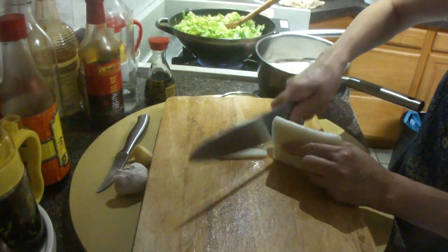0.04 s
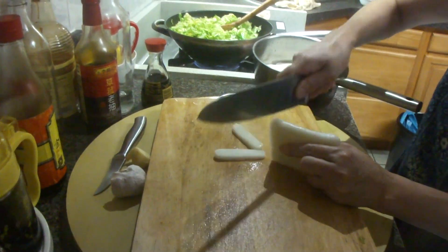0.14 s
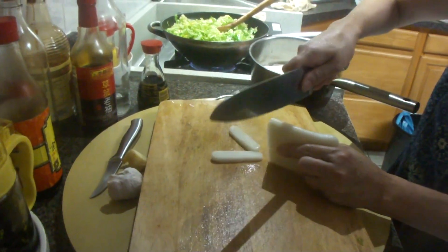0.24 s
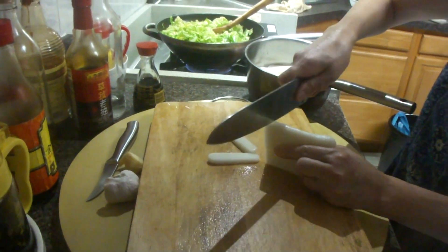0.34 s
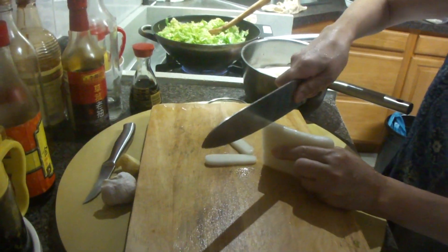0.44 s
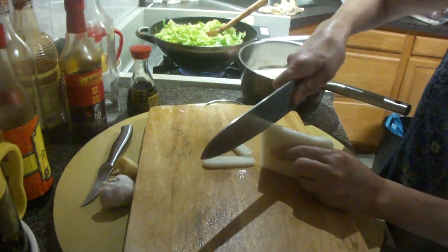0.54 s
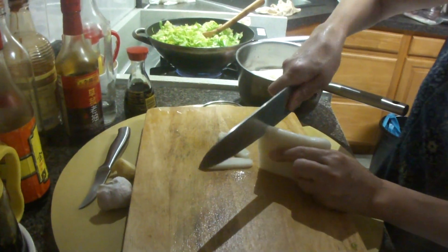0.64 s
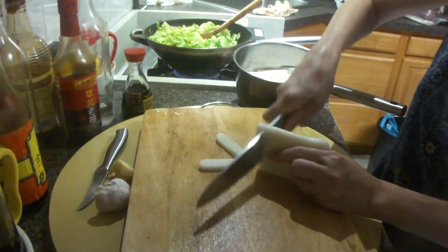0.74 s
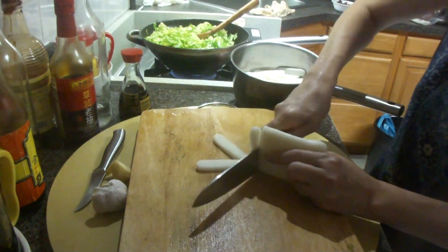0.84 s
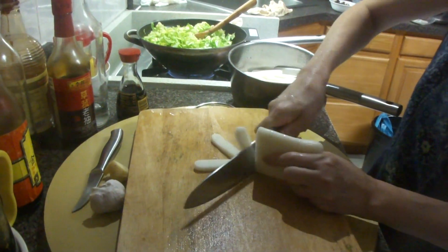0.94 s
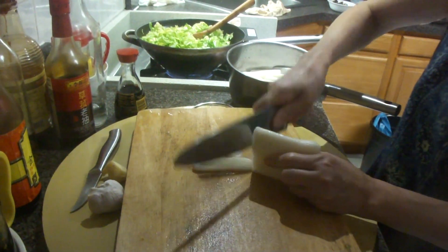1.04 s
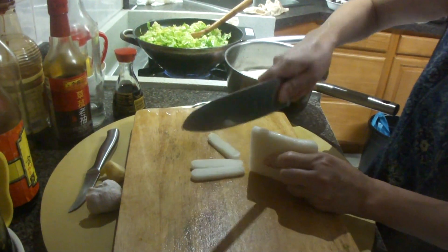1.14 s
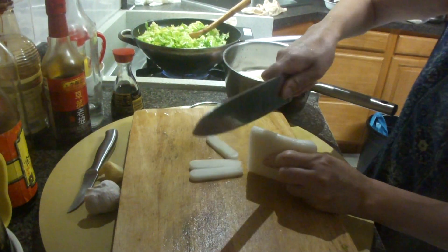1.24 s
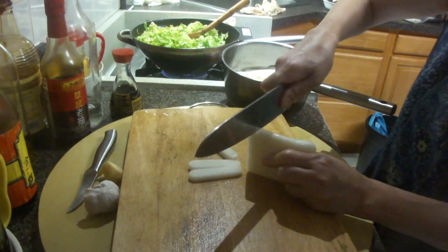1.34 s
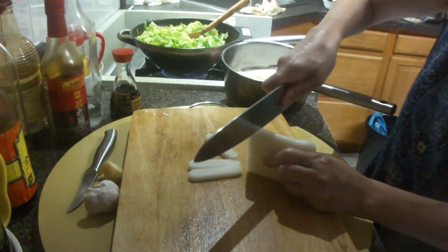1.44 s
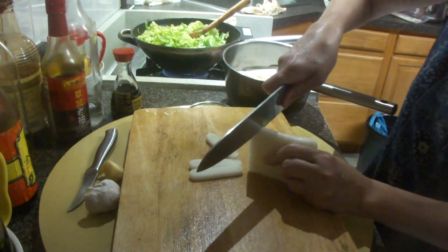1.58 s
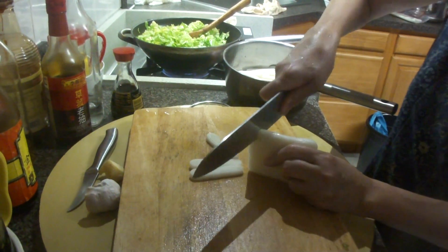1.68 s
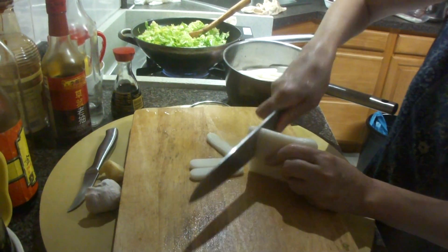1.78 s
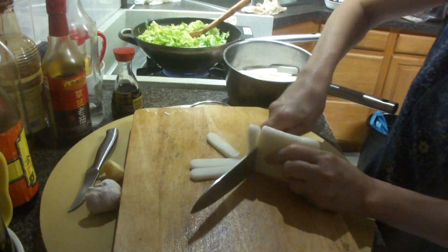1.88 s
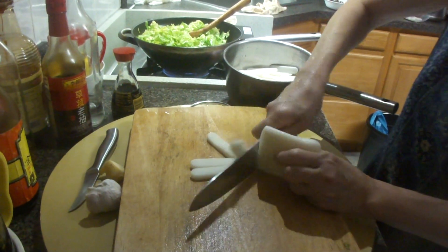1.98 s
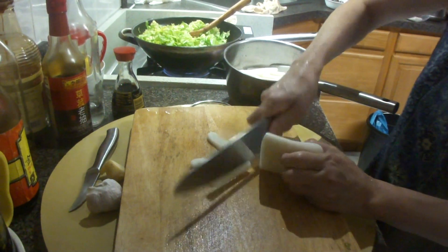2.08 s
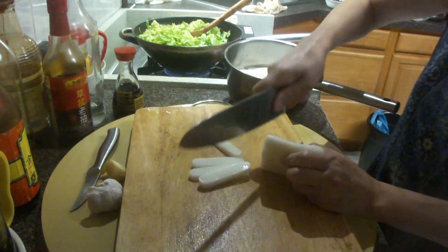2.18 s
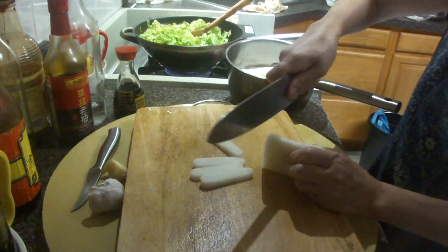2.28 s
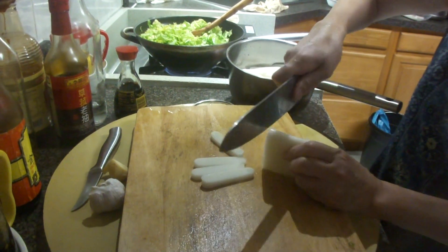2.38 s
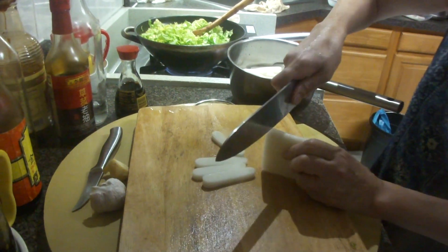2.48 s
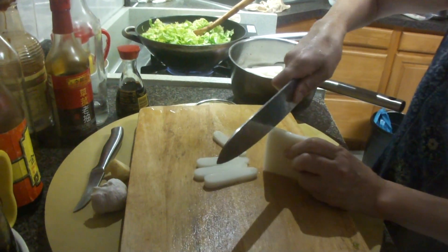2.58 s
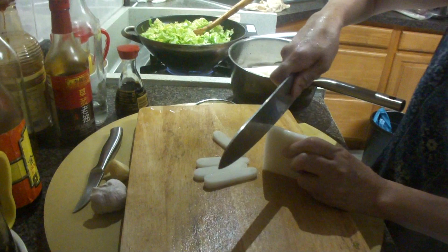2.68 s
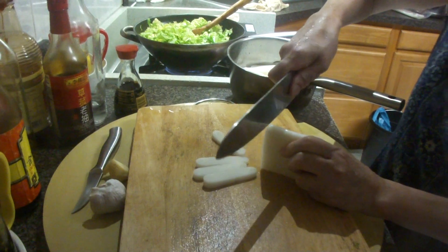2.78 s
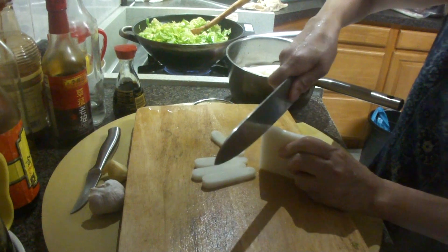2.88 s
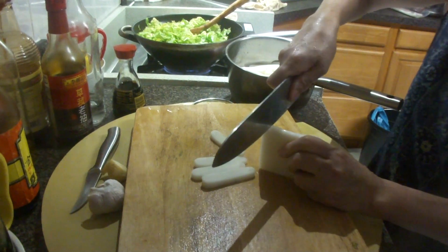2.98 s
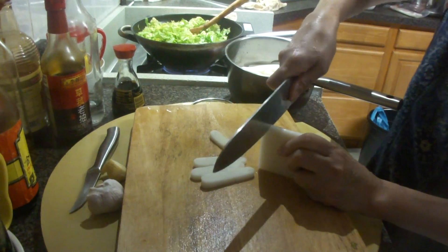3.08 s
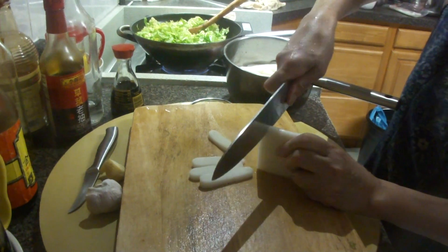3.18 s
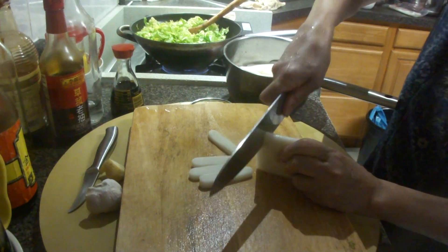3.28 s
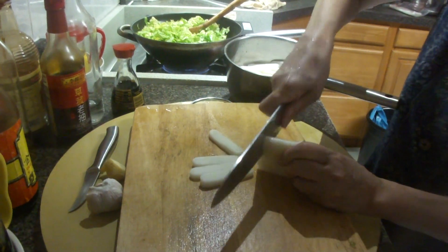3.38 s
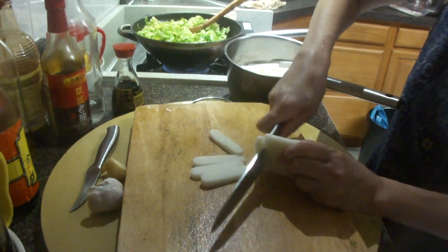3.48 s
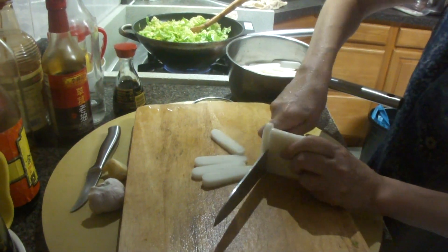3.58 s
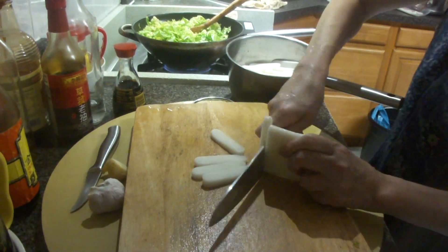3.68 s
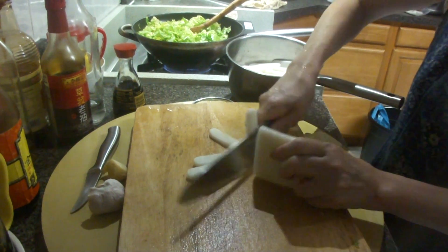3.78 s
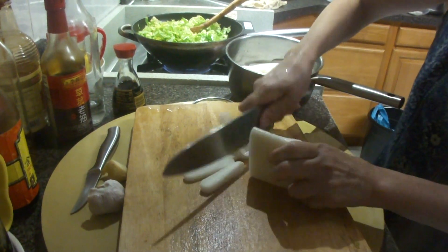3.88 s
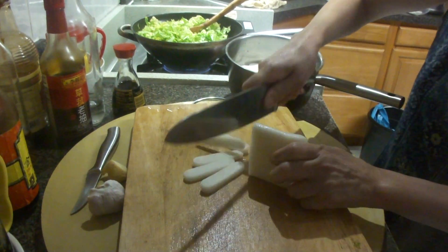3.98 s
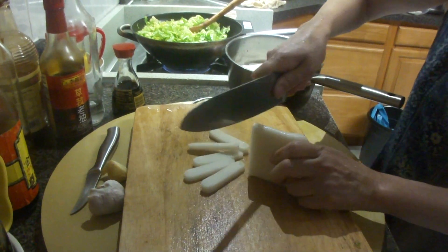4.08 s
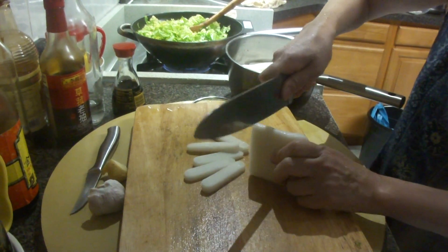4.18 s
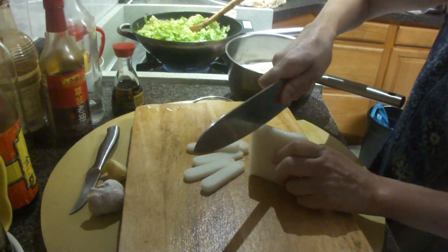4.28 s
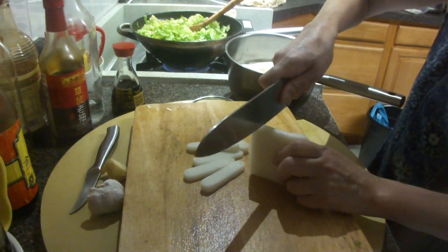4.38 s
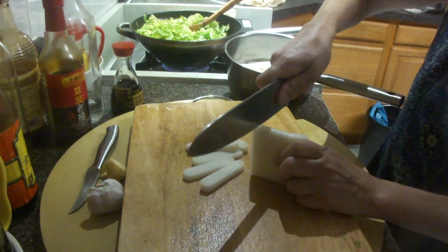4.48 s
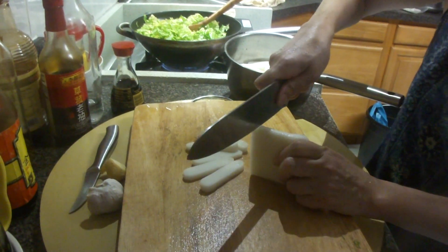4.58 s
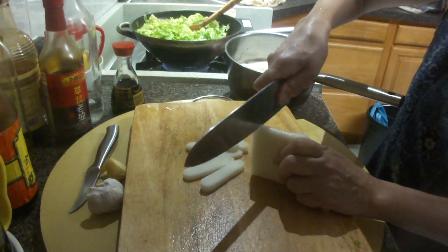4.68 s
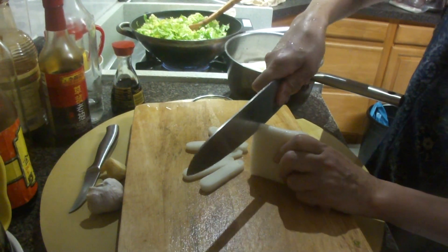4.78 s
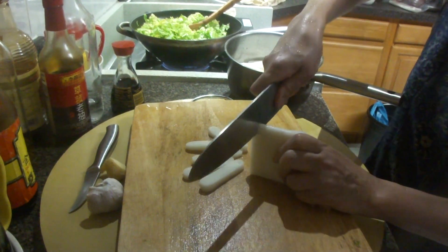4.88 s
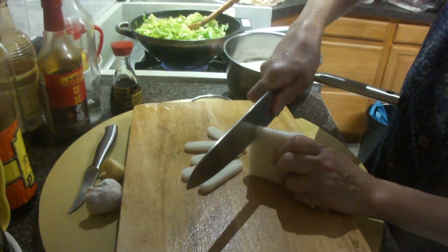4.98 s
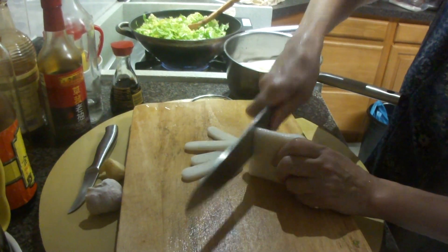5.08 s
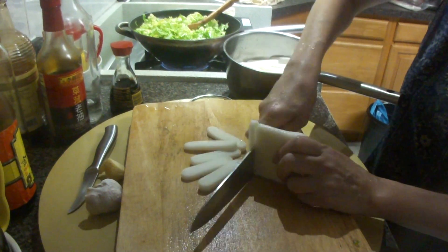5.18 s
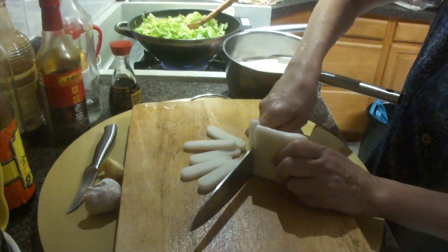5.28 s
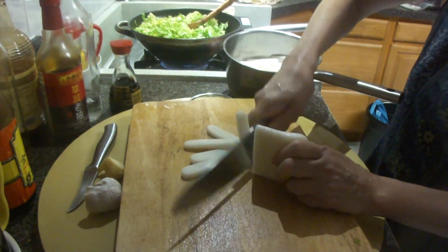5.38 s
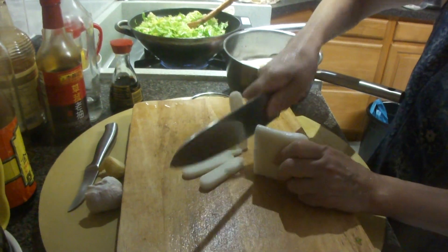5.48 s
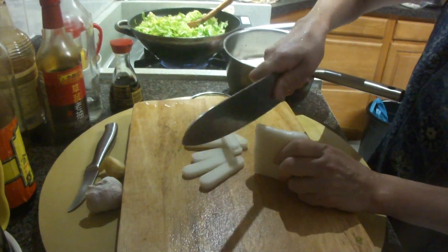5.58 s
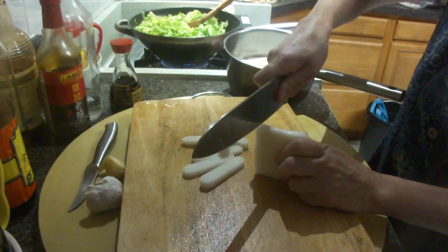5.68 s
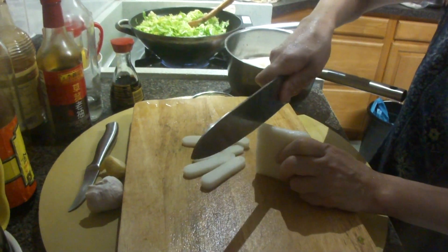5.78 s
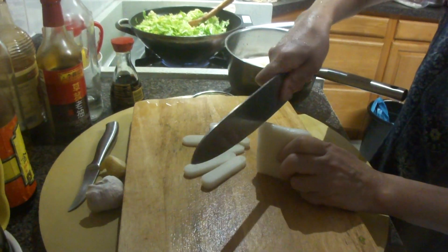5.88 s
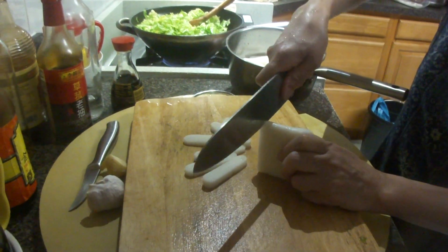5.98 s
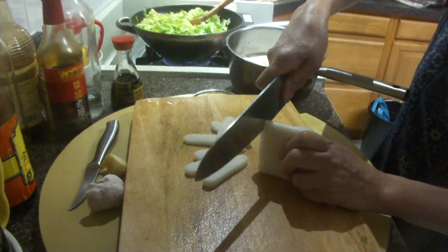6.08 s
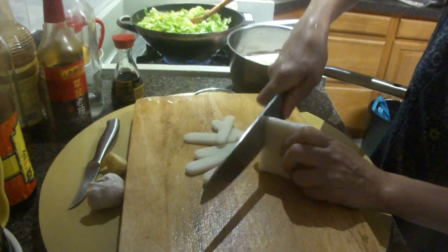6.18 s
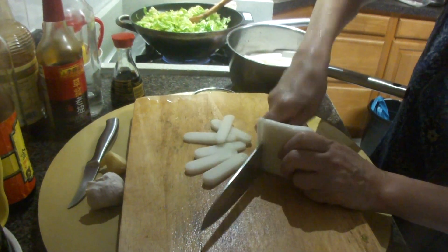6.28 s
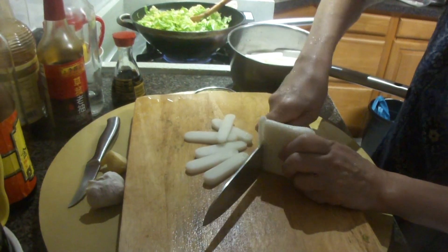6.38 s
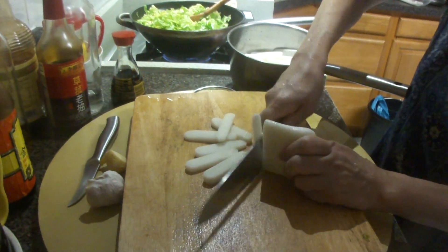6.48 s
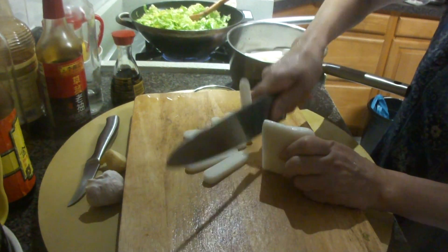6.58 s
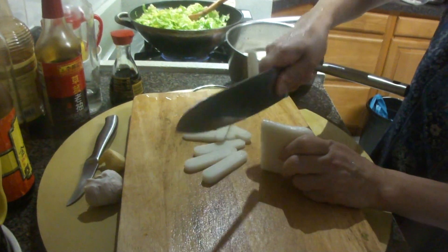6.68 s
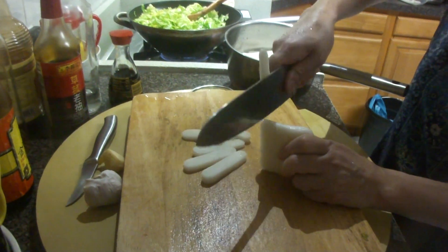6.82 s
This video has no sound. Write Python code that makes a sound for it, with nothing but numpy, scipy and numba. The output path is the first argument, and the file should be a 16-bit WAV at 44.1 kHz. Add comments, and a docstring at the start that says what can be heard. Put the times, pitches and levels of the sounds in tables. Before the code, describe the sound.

Five loud, woody chopping knocks with a bright, slightly distorted snap ring briefly through a kitchen, with soft slice pats and steady fan noise.

```python
"""Knife chopping rice cake

A blade is pressed through a firm block five times; each knock is band-passed board modes plus a bright overload
click and crackle; the counter (delayed sine modes) and kitchen (decaying noise) ring after it. The blade rubs,
squeaks and ticks (coloured noise, wavering tones); slices topple with dull pats. A cooker-hood fan hums (resonant
noise, two tones) over a steady filtered hiss. A limiter ducks on the knocks, then a soft clipper bends the peaks."""
import sys
import numpy as np
from scipy import signal
from scipy.fft import rfft, irfft, next_fast_len
from scipy.io import wavfile
from scipy.ndimage import minimum_filter1d, map_coordinates
from numba import njit

SR = 44100
rng = np.random.default_rng(int(sys.argv[2]) if len(sys.argv) > 2 else 0)


def inscribe(sig):
    """Save sig as 16-bit PCM at rate SR to the path in sys.argv[1].

    A 1-D sig is mono; a 2-D sig holds one channel per row.
    Samples are clipped to [-1, 1] before scaling.
    """
    pcm = np.round(np.clip(np.atleast_2d(sig).T, -1, 1) * 32767)
    wavfile.write(sys.argv[1], SR, pcm.astype(np.int16))


N = 302085
RING_N = SR // 2  # samples in one ring after a blow

# knife meets board: t/s, relative force/dB, relative overload click and crackle/dB
CHOPS = [(0.8436, -1.5, -9), (1.9104, -1, -8), (3.5720, -5.5, -12.5), (5.2078, -2.6, -7),
         (6.3544, -1.5, -6.5)]


def amp(db):
    """Amplitude factor of a level in dB."""
    return 10 ** (np.asarray(db) / 20)


def unit(x):
    """Scale to rms 1."""
    return x / np.sqrt(np.mean(x ** 2) + 1e-20)


def along(points, hz):
    """Interpolate (f/Hz, value) points on a log frequency axis."""
    f, v = np.transpose(points)
    return np.interp(np.log(hz + 1), np.log(f), v)


def bumps(rows, hz):
    """Bell-shaped peaks or dips in dB; the width is two standard deviations."""
    return sum(db * np.exp(-2 * ((hz - centre) / width) ** 2) for centre, width, db in rows)


def wobble(rate):
    """A smooth random curve, rate knots a second."""
    knots = rng.standard_normal(int(N * rate / SR) + 4)
    return map_coordinates(knots, [np.arange(N) * rate / SR])


def filtered(x, response):
    """Multiply the spectrum of x by a response of frequency."""
    m = next_fast_len(N + SR // 2)
    spectrum = rfft(x, m) * response(np.fft.rfftfreq(m, 1 / SR))
    return irfft(spectrum, m)[..., :N]


def noise(colour):
    """Stereo noise of rms 1, coloured in dB, its channels most alike in the bass."""
    # left-right likeness: f/Hz, correlation
    likeness = [(60, 1), (110, 0.94), (200, 1.0), (380, 0.99), (700, 0.98), (1290, 0.92), (2380, 0.88),
                (4400, 0.86), (8120, 0.54), (15000, 0.36)]

    def mid_side(hz):
        turn = np.arccos(np.clip(along(likeness, hz), -1, 1)) / 2
        return amp(colour(hz)) * [np.cos(turn), np.sin(turn)]

    mid, side = filtered(rng.standard_normal((2, N)), mid_side)
    return unit(np.array([mid + side, mid - side]))


def add(track, s, sound):
    """Mix a sound into a track from time s."""
    part = track[..., round(s * SR):][..., :sound.shape[-1]]
    part += sound[..., :part.shape[-1]]


def decay(s, t60):
    """An envelope that jumps up at s and dies away exponentially."""
    t = np.arange(N) / SR - s
    return (t >= 0) * amp(-60 * np.abs(t) / t60)


def swell(s, sigma_s):
    """A bell-shaped envelope around s."""
    return np.exp(-.5 * ((np.arange(N) / SR - s) / sigma_s) ** 2)


def chops():
    """The blade breaks through the cake and the board knocks, with a bright overload click and crackle."""
    # overload click and crackle spectrum: f/Hz, level/dB
    crackle_colour = [(60, -30), (300, -12), (2000, -1.5), (2750, -20), (3400, 5), (4200, -0.5), (4900, -7),
                      (5700, -6.5), (8500, -15), (14000, -24), (16000, -35)]
    crackle_db, crackle_t60_s = -16, 0.011  # a few ms of bright distortion from overload
    out = np.zeros((2, N))
    overload_click = click(crackle_colour)
    bright_noise = noise(lambda hz: along(crackle_colour, hz))
    usual = surroundings()  # the knife lands on nearly the same spot, so the answers are much alike
    for s, force_db, overload_db in CHOPS:
        answer = (usual + surroundings()) / np.sqrt(2)
        knock = blow(amp(-3.5) * answer, contact_hz=2270)
        add(out, s, amp(force_db + 0.5) * knock)
        add(out, s + .0005, amp(overload_db - 5.0) * overload_click)
        out += amp(overload_db + crackle_db) * decay(s, crackle_t60_s) * bright_noise.mean(0)
        # fainter, longer burst dying after the knock
        out += amp(overload_db - 31.5) * decay(s, t60=0.1) * bright_noise
    return out


def click(colour, size=2048):
    """One clean, causal (minimum-phase) pulse of peak 1 with the given spectrum."""
    log_spectrum = np.log(amp(along(colour, np.fft.rfftfreq(size, 1 / SR))))
    cepstrum = irfft(log_spectrum)
    pulse = irfft(np.exp(rfft(2 * cepstrum[:size // 2], size)))
    return pulse / np.abs(pulse).max()


def blow(answer, contact_hz):
    """One contact rings the board and all around it; a softer contact is duller."""
    band = signal.butter(2, [230, contact_hz], 'band', fs=SR, output='sos')
    return signal.sosfilt(band, board(scatter_db=1.74) + answer)


def board(scatter_db):
    """The board's own short ring; neighbouring modes swing opposite ways."""
    # board modes: f/Hz, level/dB, t60/s
    board_modes = [(568, 1.5, 0.075), (698.5, -0.5, 0.073), (865, -11.5, 0.12), (1072, -2, 0.064),
                   (1229, 3.5, 0.064), (1330, -18.5, 0.03), (1475, -16, 0.2), (1672, -2.5, 0.04),
                   (2290, -13.5, 0.029)]
    t = np.arange(RING_N) / SR
    ring = np.zeros(RING_N)
    for k, (hz, db, t60) in enumerate(board_modes):
        level = amp(db + scatter_db * rng.normal() - 60 * t / t60)
        ring += (-1) ** k * level * np.cos(2 * np.pi * hz * t)
    return ring


def surroundings():
    """The counter and the kitchen answer a blow on the board."""
    shaken = amp(-19.0) * counter(build_s=0.028, scatter_db=-1)
    return shaken + amp(7) * kitchen(build_s=0.007, width=0.23)


def counter(build_s, scatter_db):
    """The counter takes up the blow gradually and rings on."""
    # modes of the counter and the pans on it: f/Hz, relative level/dB, t60/s
    counter_modes = [(408, 4, 0.36), (522, 12, 0.33), (545.5, 6, 0.32), (565, 11, 0.36), (594, 9, 0.37),
                     (693, 9, 0.33), (726, 1, 0.37), (1042, 9, 0.32), (1170, 5.5, 0.31), (1233, 7, 0.35),
                     (1292, -2, 0.48), (1470, -1.5, 0.35), (1574, -1, 0.31), (1704, -6, 0.76)]
    t = np.arange(RING_N) / SR
    ring = np.zeros(RING_N)
    for hz, db, t60 in counter_modes:
        level = amp(db + scatter_db * rng.normal() - 60 * t / t60)
        ring += level * np.sin(2 * np.pi * (hz * t + rng.random()))
    return ring * (1 - np.exp(-(t / build_s) ** 2))


def kitchen(build_s, width):
    """The room's diffuse answer to a blow, in stereo; it gathers as the walls reply."""
    # board radiation and room decay: f/Hz, relative level/dB, t60/s
    room_bands = [(100, -38, .35), (340, -15, 0.23), (450, -4.5, 0.39), (580, -1, 0.52), (700, 6, 0.38),
                  (830, -8.5, 0.54), (980, -2.5, 0.4), (1010, 3.5, 0.32), (1210, 1, 0.43), (1380, -3, 0.39),
                  (1750, -4.5, 0.52), (1820, -17.5, .35), (2120, -14, 0.29), (3040, -35, 0.22)]
    hz, t, z = signal.stft(rng.standard_normal((2, RING_N)), SR, nperseg=1024)
    band_hz, level, life = np.transpose(room_bands)
    db = np.interp(np.log(hz + 1), np.log(band_hz), level)[:, None]
    t60 = np.interp(np.log(hz + 1), np.log(band_hz), life)[:, None]
    z = z * amp(db - 60 * t / t60) * (hz < band_hz[-1])[:, None]
    mid, side = signal.istft(z, SR, nperseg=1024)[1][:, :RING_N]
    gather = 1 - np.exp(-(np.arange(RING_N) / SR / build_s) ** 2)
    return gather * np.array([mid + width * side, mid - width * side])


def slices():
    """A soft slice flops over, lands with a dull pat and damps the board where it lies."""
    # landings: t/s, relative level/dB
    landings = [(1.127, -16), (2.134, -10.5), (2.292, -19), (3.99, -17.5), (5.515, -22)]
    pat_hz, pat_t60_s, pat_db = 552, 0.083, -7  # the slice's own dull thud, a little below the board's lowest note
    out = np.zeros((2, N))
    t = np.arange(RING_N) / SR
    damping = decay(0, t60=0.13)[:RING_N]
    rise = 1 - np.exp(-t / 0.0023)
    pat = amp(pat_db - 60 * t / pat_t60_s) * rise * np.sin(2 * np.pi * pat_hz * t)
    for s, db in landings:
        knock = damping * blow(amp(-2) * surroundings(), contact_hz=715)
        add(out, s, amp(db) * (pat + amp(-8.5) * knock))
    return out


def blade():
    """Steel rubs in tiny slips as it bites into the sticky cake and is lifted out; it squeaks and ticks."""
    # the edge bites and drags until it glides: t/s, level/dB, t60/s
    bites = [(.515, -48, .6), (0.774, -38, 0.17), (1.672, -41, 0.63), (2.908, -42.5, 0.16), (5.05, -48, .3),
             (5.962, -45.5, 0.69)]
    # rub spectrum: f/Hz, level/dB
    rub_colour = [(100, -45), (500, -20), (2000, 6), (4500, -21), (6000, 6), (8000, 10), (10500, 2),
                  (12500, -34), (15500, -6)]
    # squeak tones: f/Hz, level/dB
    squeak_tones = [(1530, -27.5), (3350, -53), (5400, -46), (7230, -33)]
    # light ticks of the blade: t/s, level/dB, t60/s
    ticks = [(.019, -15.5, 0.096)]
    # tick spectrum: f/Hz, level/dB
    tick_colour = [(60, -45), (200, -22), (700, 3.5), (1300, 3), (2200, 0.5), (3000, -24), (4800, -40),
                   (6000, -16.5), (9500, -19), (12000, -54), (16000, -63)]
    bite_rise_s = 0.0056  # the edge takes hold
    judder_hz, judder_db = 27, 3.5  # the dragging edge catches and slips
    lift_after_s, lift_sigma_s, lift_db = .228, 0.013, -51  # wipes the cut face after each knock
    squeak_s, squeak_sigma_s, squeak_rub_db = 3.799, .0065, -43.5  # once, the lifted blade sticks

    t = np.arange(N) / SR
    grip = amp(3.8 * wobble(350))
    bite = np.zeros(N)
    for s, db, t60 in bites:
        rise = 1 - np.exp(-np.abs(t - s) / bite_rise_s)
        judder = amp(judder_db * np.sin(2 * np.pi * judder_hz * (t - s)))
        bite += amp(db) * decay(s, t60) * rise * judder
    lift = amp(lift_db) * sum(swell(s + lift_after_s, lift_sigma_s) for s, *_ in CHOPS)
    stuck = swell(squeak_s, squeak_sigma_s)
    friction = unit(grip * noise(lambda hz: along(rub_colour, hz)))
    rub = (bite + lift + amp(squeak_rub_db) * stuck) * friction

    slip_s = np.cumsum(1 + 0.0043 * wobble(300)) / SR  # warped time: the squeak's pitch wavers
    tones = sum(amp(db) * np.sin(2 * np.pi * hz * slip_s) for hz, db in squeak_tones)
    squeak = stuck * tones * unit(grip)

    tick_level = sum(amp(db) * decay(s, t60) for s, db, t60 in ticks)
    tick = tick_level * noise(lambda hz: along(tick_colour, hz))
    return rub + squeak + tick


def hood():
    """Air roars through the duct's resonances under the fan's slightly unsteady tones."""
    # air rush spectrum: f/Hz, relative density/dB per Hz
    air_colour = [(20, -55), (65, -47), (95, -27.5), (125, -22), (170, -14.5), (230, -6.5), (300, 0.5),
                  (430, -9), (650, -11.5), (980, -14), (1500, -15), (2150, -17.5), (2500, -28), (2850, -43),
                  (4000, -104)]
    # hood and duct resonances: f/Hz, width/Hz, gain/dB
    duct_peaks = [(127.7, 13, 5.5), (171.4, 9.5, 4), (207, 10.3, 6), (252.1, 14.6, 7.5), (395.6, 3.8, 6.5),
                  (474, 16, 3), (758.3, 48, 8), (1065, 12, 6), (1438, 21, 5.5), (1525, 21, 4),
                  (1936, 17, 7.5)]
    # fan tones: f/Hz, rms level/dB
    fan_tones = [(331.9, -36), (259.8, -49.5)]
    t = np.arange(N) / SR
    level = amp(-26.5 + 0.49 * wobble(4.033))
    air = level * noise(lambda hz: along(air_colour, hz) + bumps(duct_peaks, hz))
    tones = np.zeros(N)
    for hz, db in fan_tones:
        tone_level = amp(db + 2.5 * wobble(5)) * np.sqrt(2)
        tones += tone_level * np.sin(2 * np.pi * hz * t + .5 * wobble(4))
    return air + tones


def hiss():
    """Steady filtered hiss: noise with narrow dips and a weak band near 12-14 kHz."""
    # hiss spectrum: f/Hz, relative density/dB per Hz
    hiss_colour = [(100, -13), (2800, -3), (3400, -7.5), (4400, -7.5), (5000, -15.5), (5500, 1),
                   (7500, 1.5), (9000, -1.5), (10300, -7), (11200, -16.5), (12000, -38), (13700, -30),
                   (14700, -17), (15800, -15.5)]
    # narrow filter dips: f/Hz, width/Hz, gain/dB
    notches = [(3010, 150, -46), (4004, 330, -15), (5050, 110, -21)]
    return amp(-47.5) * noise(lambda hz: along(hiss_colour, hz) + bumps(notches, hz))


def scene():
    """Sum of all sources, in stereo."""
    return chops() + slices() + blade() + hood() + hiss()


@njit
def follow(level, attack, release):
    """A one-pole level follower with separate rise and fall coefficients per sample."""
    out, held = np.zeros(len(level)), 0.
    for i in range(len(level)):
        held += (level[i] - held) * (attack if level[i] > held else release)
        out[i] = held
    return out


def limited(x, ceiling_db, attack_s, hold_s, release_s, ahead_s):
    """Turn the gain down just before the sound passes the ceiling, hold it, then let go."""
    over_db = np.maximum(20 * np.log10(np.abs(x).max(0) + 1e-9) - ceiling_db, 0)
    size = int(hold_s * SR) // 2 * 2 + 1
    # running maximum, shifted to look ahead
    held_db = -minimum_filter1d(-over_db, size, origin=size // 2 - int(ahead_s * SR))
    return x * amp(-follow(held_db, 1 / (attack_s * SR), 1 / (release_s * SR)))


def record(dry):
    """The limiter ducks on knocks; peaks are soft-clipped, deep bass and top treble cut."""
    top_hz = 15950
    x = limited(dry, ceiling_db=1.0, attack_s=0.00012, hold_s=0.017, release_s=0.0063, ahead_s=0.00038)
    x = x / (1 + np.abs(x) ** 12) ** (1 / 12)
    x = signal.sosfilt(signal.butter(1, 65, 'high', fs=SR, output='sos'), x)
    return filtered(x, lambda hz: hz < top_hz)


dry = scene()
out = record(dry)
inscribe(out)
```